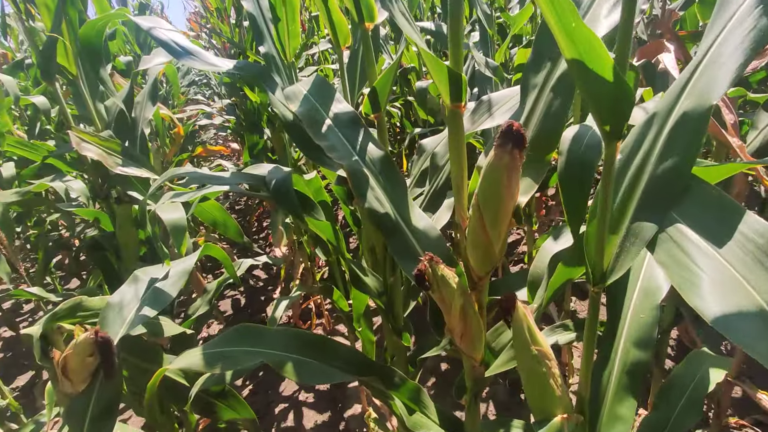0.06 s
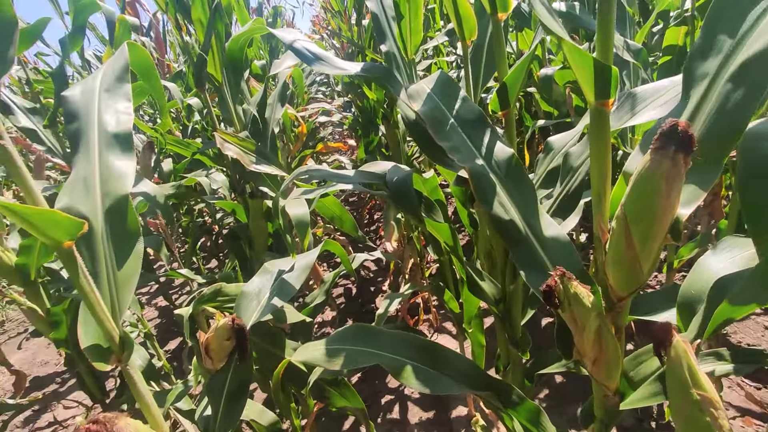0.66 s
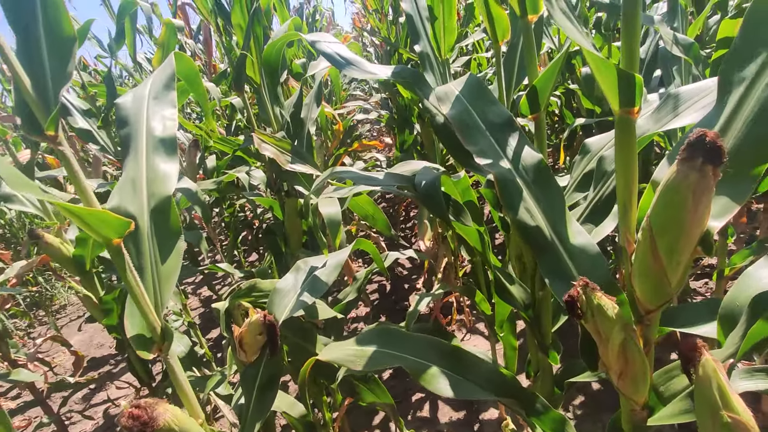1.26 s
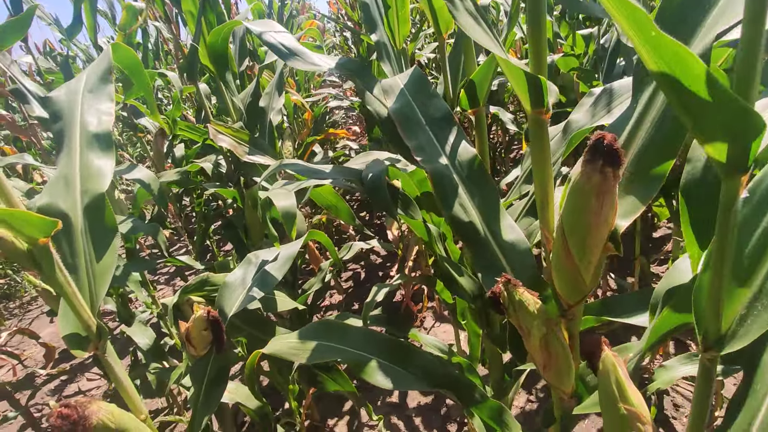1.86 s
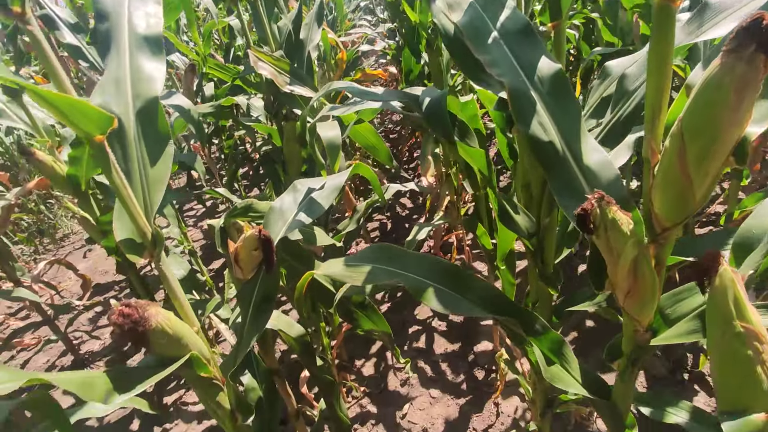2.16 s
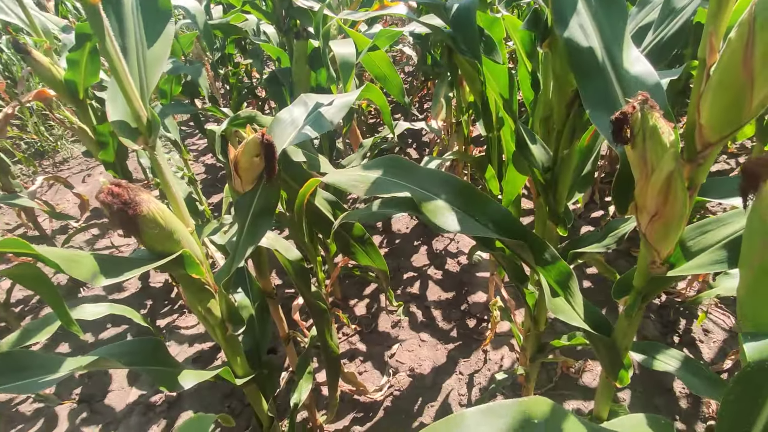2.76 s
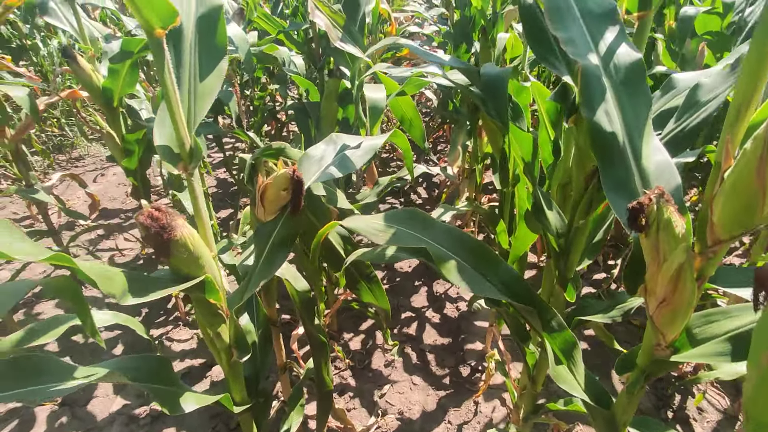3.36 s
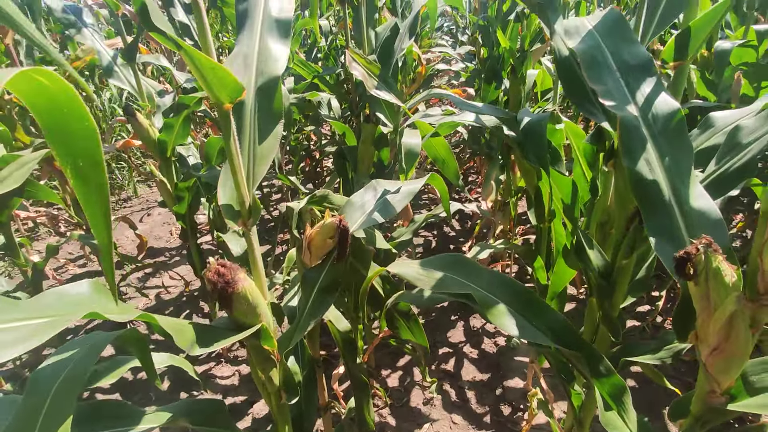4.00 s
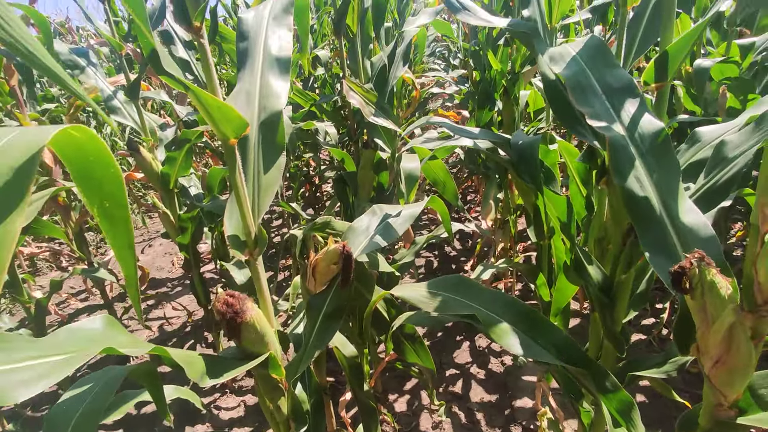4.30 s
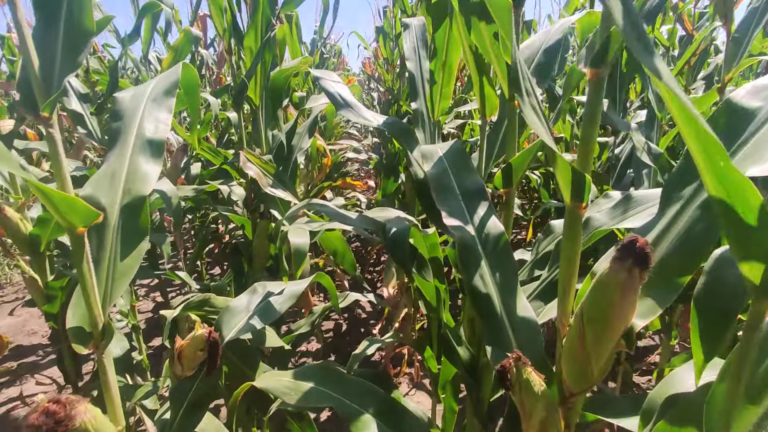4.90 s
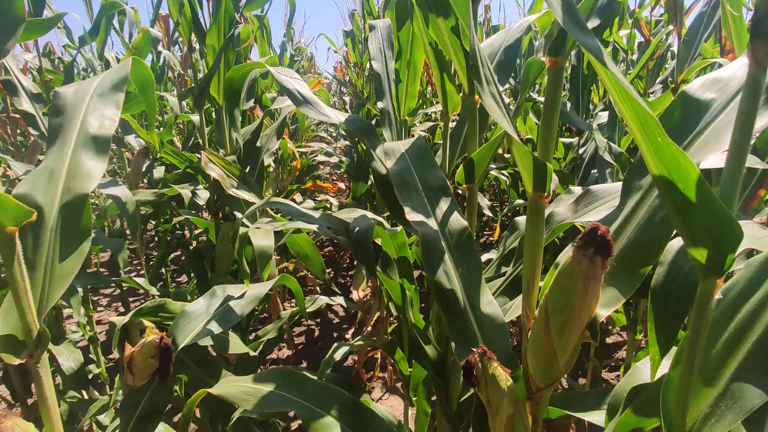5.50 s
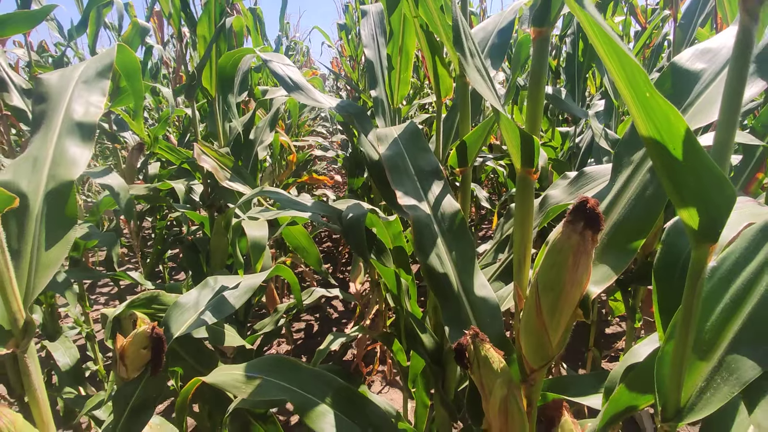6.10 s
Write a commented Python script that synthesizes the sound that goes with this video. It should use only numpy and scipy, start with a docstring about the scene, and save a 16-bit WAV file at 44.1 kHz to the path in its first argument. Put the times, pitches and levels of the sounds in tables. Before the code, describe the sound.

Dry leaves rustle and crackle close by as someone pushes slowly through tall maize, with a few light knocks and one sharp snap.

```python
"""A dry rustle swells and fades as someone pushes slowly through tall maize, a camera among the leaves.
The rustle is stick-slip friction: stiff blades slide over each other in countless tiny slips, and now
and then grip and creak. Buckling blades release their strain in sharp crackles, and one rib snaps.
A few leaves and stalks knock against the casing; faint air rumbles at its two microphone ports."""
import sys
import numpy as np
from scipy import signal
from scipy.fft import rfft, irfft, next_fast_len
from scipy.io import wavfile
from scipy.ndimage import uniform_filter1d, map_coordinates

SR = 44100
rng = np.random.default_rng(int(sys.argv[2]) if len(sys.argv) > 2 else 0)


def transcribe(signal):
    """Save signal, clipped to [-1, 1], as a 16-bit WAV file at the path in sys.argv[1]."""
    frames = np.atleast_2d(signal).T
    limited = np.clip(frames, -1, 1)
    pcm = np.round(limited * 32767).astype(np.int16)
    wavfile.write(sys.argv[1], SR, pcm)


N = 275625

# spectrum of moving air: frequency_hz, density_db
AIR_SPECTRUM = [(15, 3.5), (30, 3.5), (60, -2.5), (120, -7.5), (300, -17), (1000, -73)]
# puffs of air at the ports: peak_s, half_length_s, level_db
AIR_PUFFS = [(0.02, 0.1, -58.5), (0.853, .08, -63), (1.182, 0.1, -69), (1.536, 0.091, -64),
             (2.145, 0.06, -61), (2.342, 0.14, -65)]
# two leaves grip and creak: centre_s, level_db, pitch_hz, length_s
LEAF_CREAKS = [(0.824, -44.5, 865, 0.049), (0.923, -39.5, 1080, 0.035), (0.98, -46.5, 980, 0.26),
               (1.049, -40.5, 1150, 0.072), (1.089, -49.5, 750, 0.052), (1.511, -38, 3100, 0.033),
               (2.864, -37, 2210, 0.016), (2.93, -34, 2120, 0.031), (3.131, -44.5, 1130, 0.074),
               (4.235, -48, 865, 0.13), (4.282, -33, 2170, 0.068), (4.993, -38.5, 2050, 0.045),
               (5.087, -53, 480, 0.059), (5.227, -49, 500, 0.089), (5.601, -54.5, 350, 0.074),
               (5.666, -57, 370, 0.11), (5.994, -37.5, 2300, .04), (6.150, -44.5, 2050, 0.06)]
# blows on the casing: start_s, level_db, pitch_hz, ring_q, thud_re_ring_db, left_minus_right_db
CASING_KNOCKS = [(0.641, -27.5, 1700, 1.7, -42, -1), (0.6418, -40, 556, 4.2, -42, -3),
                 (1.9361, -21.5, 1400, 0.47, -15, 11), (1.9414, -23, 1180, 1.6, -13, 33),
                 (2.23, -32, 900, 1, -19, 3), (2.4637, -22, 560, 0.53, -27, -43),
                 (3.1187, -28, 1110, 6.5, -57, 3), (3.166, -21, 1420, 1.8, -52, 0),
                 (3.2153, -30.5, 450, 2, -37, 2), (3.216, -27.5, 1290, 14, -39, 12),
                 (4.773, -34, 1080, 2.4, -38, 17), (5.422, -35, 860, 2.4, -27, 4),
                 (5.582, -38.5, 503, 2, -16, 2), (5.974, -30.5, 750, 2.9, -45, -3)]
# blades buckle: start_s, level_db, pitch_hz, edge_db (sets the top treble), decay_s
BLADE_BUCKLES = [(0.1326, -26, 3680, -47, 0.0024), (0.183, -32.5, 2580, -66, 0.0035),
                 (0.287, -39, 2380, -41, 0.0022), (0.378, -29, 3100, -60, 0.0022),
                 (0.4416, -29, 5010, -37, 0.0014), (0.471, -32, 2800, -64, .002),
                 (0.5676, -23, 4900, -36, 0.0017), (0.585, -32, 2700, -66, .003),
                 (0.677, -31, 2950, -51, 0.0045), (0.692, -28.5, 4240, -34.5, 0.0049),
                 (0.773, -21, 4270, -52, 0.00091), (0.7926, -17, 4220, -36, 0.0018),
                 (0.8365, -18, 4840, -34, 0.0025), (0.8451, -17, 4690, -23, 0.0014),
                 (0.8555, -24, 3920, -27, .0015), (0.8582, -13.5, 4300, -44, 0.0017),
                 (0.941, -24, 3300, -50, 0.00071), (0.999, -20, 3540, -62, 0.0037),
                 (1.0112, -26, 4000, -40, .002), (1.0533, -21, 3180, -54, 0.0015),
                 (1.0624, -12, 4160, -55, 0.0013), (1.142, -30, 3200, -67, 0.003),
                 (1.2102, -23, 4100, -52, 0.0018), (1.5069, -27, 3200, -63, 0.0017),
                 (1.5797, -27.5, 3300, -49, 0.0072), (1.762, -32, 2900, -63, 0.0011),
                 (1.995, -34, 2500, -64, 0.0018), (2.0542, -32.5, 3100, -55, .002),
                 (2.1538, -33.5, 4100, -56, 0.0017), (2.2286, -24, 4000, -46, 0.0085),
                 (2.3270, -22.5, 4200, -60, 0.0018), (2.7015, -25.5, 3500, -56, 0.0016),
                 (2.7336, -21, 4550, -54, 0.0016), (2.7742, -29.5, 2900, -62, 0.0031),
                 (2.789, -27, 2300, -68, .001), (2.809, -27, 1860, -70, 0.0013),
                 (2.8236, -33, 3200, -68, .0008), (2.835, -33, 4100, -68, .0007),
                 (2.8616, -24.5, 2180, -69, .0015), (2.9192, -17.5, 2400, -55, 0.00075),
                 (2.929, -30, 2580, -53, 0.0026), (3.118, -24, 4200, -56, 0.0011),
                 (3.171, -26, 5920, -52, .0015), (3.1966, -26, 5900, -58, 0.0007),
                 (3.203, -33, 6000, -66, 0.0012), (3.2880, -28.5, 3370, -68, 0.0018),
                 (3.3565, -22, 3600, -62, .0018), (3.363, -29, 4000, -66, 0.002),
                 (3.412, -24, 2470, -74, 0.0025), (3.831, -26.5, 3800, -65, .001),
                 (3.934, -29, 3180, -66, 0.0046), (4.026, -22.5, 3600, -71, .0015),
                 (4.094, -28, 4000, -36, 0.0023), (4.243, -18, 3700, -55, 0.0017),
                 (4.267, -16.5, 3800, -48, 0.0013), (4.277, -16, 4200, -52, 0.0013),
                 (4.2895, -22, 2300, -32, 0.0053), (4.321, -29, 3600, -70, 0.0034),
                 (4.377, -33.5, 3880, -72, .0008), (4.43, -27.5, 5300, -62, 0.0027),
                 (4.569, -27.5, 3770, -58, 0.002), (4.626, -24, 3280, -58, 0.0018),
                 (5.08, -30, 4600, -60, .0015), (5.187, -27.5, 4500, -60, 0.0025),
                 (5.216, -22, 2860, -57, 0.0023), (5.428, -28.5, 2600, -69, 0.0051),
                 (5.5380, -28.5, 5530, -54, 0.0037), (5.6404, -25, 5000, -65, 0.0034),
                 (5.9731, -21.5, 4260, -37, 0.0026), (6.134, -27, 2200, -77, 0.002),
                 (6.141, -26, 4130, -73, 0.0012), (6.148, -23.5, 3870, -62, 0.0013),
                 (6.2005, -18.5, 2280, -54, 0.0044), (6.208, -20.5, 4400, -64, 0.003),
                 (6.2200, -20, 2450, -47, 0.0021)]
# the two steps of a breaking rib: start_s, level_db, pitch_hz
RIB_BREAKS = [(3.2128, -9, 5500), (3.2148, -6, 4300)]
# spectrum of one slip on a blade: frequency_hz, density_db
SLIP_SPECTRUM = [(60, -36), (150, -25.5), (250, -15.5), (420, -11.5), (750, -9), (1150, -3.5), (1600, -1.5),
                 (2300, 0), (3500, 1.5), (5000, -0.5), (6600, -2), (7400, -17.5), (10000, -21.5),
                 (14000, -32)]
# leaves stirring all around: time_s, level_db
STIR_LEVELS = [(0.0, -46), (0.66, -50), (0.96, -39), (1.29, -49), (1.69, -42.5), (2.07, -47.5),
               (3.13, -47.5), (4.54, -48), (4.92, -49.5), (5.1, -46), (5.73, -49), (6.25, -45)]
# leaves swing clear and the stirring drops (or rises, at negative depth): centre_s, depth_db
STIR_LULLS = [(.16, 6.5), (.405, 3), (.64, -2), (1.12, 6.5), (1.36, -1), (1.97, 4.5), (2.2, 6), (2.55, 0.5),
              (2.82, 0.5), (3.45, 0), (4.39, 5.5), (6.11, 4)]
# a leaf drags past, gripping harder until it slides free:
# peak_s, rise_s, release_s, level_db, rasp_hz, rasp_height_db, body_re_level_db, edge_re_level_db
LEAF_STROKES = [(.10, 0.065, 0.046, -44.5, 1950, 13, -12.5, -22),
                (.32, 0.16, .12, -46.5, 2420, 1, -13, -14.5), (.52, 0.4, 0.15, -49, 2380, 7.5, -14.5, -15),
                (.72, 0.038, 0.044, -37.5, 3700, 4, -35, -17),
                (0.859, 0.049, 0.027, -29.5, 3960, 3, -37, -18),
                (.985, 0.098, 0.063, -27.5, 3680, 12, -24, -21),
                (1.053, 0.037, 0.02, -26, 4070, 8, -24.5, -19),
                (1.085, 0.014, 0.015, -39, 2700, 8, -22, -17),
                (1.175, 0.016, 0.031, -34, 3220, 11.5, -18.5, -21),
                (1.24, 0.046, 0.081, -41.5, 3300, -1, -17, -20),
                (1.308, 0.043, 0.019, -35, 3300, 8.5, -20, -19),
                (1.432, 0.019, 0.01, -40.5, 3160, 7, -20, -26),
                (1.475, 0.022, 0.031, -43, 3140, 7, -21, -21),
                (1.517, 0.024, 0.027, -39.5, 3120, 8.5, -29, -19),
                (1.6, 0.026, 0.11, -39.5, 3000, -1.5, -34, -22),
                (1.81, 0.14, 0.056, -44.5, 2440, 10, -15, -19),
                (2.261, 0.012, 0.035, -34, 3560, 2, -19.5, -21),
                (2.32, 0.013, 0.017, -40.5, 3600, 6.5, -20, -17),
                (2.383, 0.038, 0.018, -33, 4550, 1.5, -24, -18.5),
                (2.471, 0.033, 0.034, -37, 4140, -1.5, -18.5, -23),
                (2.63, 0.028, 0.068, -41.5, 3550, 1, -21, -25),
                (2.73, 0.057, 0.035, -41, 3660, 4, -13, -22), (2.89, 0.033, 0.05, -40, 3780, 7.5, -18, -22),
                (2.929, 0.011, 0.012, -36.5, 2600, 6, -12.5, -27),
                (3.04, 0.11, 0.063, -39.5, 3770, 7, -41, -20.5),
                (3.118, 0.011, 0.038, -34, 6100, 7.5, -25, -18.5),
                (3.199, 0.011, 0.018, -38.5, 5870, 6, -18, -19),
                (3.36, 0.056, 0.047, -37, 3300, 5, -41, -24),
                (3.5, 0.034, 0.058, -35.5, 4130, 4.5, -29, -20),
                (3.61, 0.1, 0.075, -37, 4100, 1.5, -19, -19), (3.8, 0.19, 0.082, -44, 3330, 3, -33, -21),
                (3.945, 0.056, 0.037, -37, 3450, 7.5, -22, -17.5),
                (4.024, 0.092, 0.082, -36, 3530, 6, -17, -21.5),
                (4.23, 0.079, 0.056, -39, 3700, 6, -11.5, -19.5),
                (4.276, 0.048, 0.021, -27.5, 3920, 4, -25, -22),
                (4.44, 0.0069, 0.0085, -39.5, 5000, 5, -16, -18),
                (4.514, 0.025, 0.011, -36.5, 3400, 3, -19, -17.5),
                (4.67, 0.14, 0.089, -40.5, 3630, 3, -20.5, -22.5),
                (4.896, 0.047, 0.047, -37, 4900, 9.5, -17.5, -20.5),
                (4.982, 0.058, 0.041, -35.5, 4480, 6.5, -21.5, -19.5),
                (5.083, 0.033, 0.021, -35, 4830, 7.5, -18.5, -18),
                (5.19, 0.11, 0.064, -34.5, 4400, 0.5, -21, -23),
                (5.29, 0.039, 0.032, -36.5, 4500, 1.5, -17, -23),
                (5.38, 0.08, 0.11, -39.5, 3500, 0, -20, -21),
                (5.63, 0.07, 0.072, -36.5, 4800, 4.5, -15.5, -20.5),
                (5.85, 0.11, 0.11, -45, 3500, -2, -16.5, -25),
                (5.985, 0.018, 0.064, -31, 5300, 4.5, -19, -19.5),
                (6.145, 0.0062, 0.0085, -40, 2100, -13, -23, -28),
                (6.208, 0.0078, 0.016, -38.5, 2090, 7, -14.5, -30)]
# the left port hears more of the presence range: frequency_hz, left_minus_right_db
PORT_BALANCE = [(150, .5), (770, 1.5), (1170, 3.3), (1800, 7), (2700, 10.5), (4200, 12), (6000, 11),
                (6700, 14), (7400, 0)]


def amp(db):
    """Amplitude ratio of a level in decibels."""
    return 10 ** (np.asarray(db) / 20)


def unit(x):
    """Normalisation to an rms of 1."""
    return x / np.sqrt(np.mean(x ** 2) + 1e-20)


def along(points, hz):
    """Interpolation of (frequency_hz, value) points on a logarithmic frequency axis."""
    frequencies, values = np.transpose(points)
    return np.interp(np.log(hz + 1), np.log(frequencies + 1), values)


def wobble(rate_hz):
    """Smooth random modulation: a spline through rate_hz knots a second."""
    knots = rng.standard_normal(int(N * rate_hz / SR) + 4)
    return map_coordinates(knots, [np.arange(N) * rate_hz / SR])


def swell(peak_s, rise_s, release_s, drop_db=9):
    """Envelope peaking at 1, drop_db lower one rise time before and one release time after."""
    t = np.arange(N) / SR - peak_s
    away = np.where(t < 0, -t / max(rise_s, .004), t / max(release_s, .004))
    near = away < 6
    curvature = np.where(t[near] < 0, 1.54, 1.79)
    gain = np.zeros(N)
    gain[near] = amp(-drop_db * away[near] ** curvature)
    return gain


def filtered(x, response):
    """Linear filtering: the spectrum is multiplied by a complex frequency response."""
    n = x.shape[-1]
    padded = next_fast_len(n + 4096)
    return irfft(rfft(x, padded) * response(np.fft.rfftfreq(padded, 1 / SR)), padded)[..., :n]


def coloured(x, gain_db, size=2048):
    """Minimum-phase filtering: folding the cepstrum makes a gain curve causal."""
    cepstrum = irfft(np.log(amp(gain_db(np.fft.rfftfreq(size, 1 / SR)))))
    cepstrum[..., 1:size // 2] *= 2
    cepstrum[..., size // 2 + 1:] = 0
    impulse_response = np.atleast_2d(irfft(np.exp(rfft(cepstrum))))
    return signal.fftconvolve(x, impulse_response, axes=1)[:, :x.shape[-1]]


def resonance(hz, centre_hz, q):
    """Response of a damped harmonic oscillator, 1 at its centre."""
    return 1j * hz * centre_hz / q / (centre_hz ** 2 - hz ** 2 + 1j * hz * centre_hz / q)


def add(track, start_s, sound):
    """Superposition of a stereo sound on the track."""
    part = track[:, round(start_s * SR):][:, :sound.shape[1]]
    part += sound[:, :part.shape[1]]


def air(calm_db=-78):
    """Pressure fluctuations of light draughts rumble independently at each port."""
    puff_power = sum((amp(db) * swell(peak_s, half_s, half_s)) ** 2 for peak_s, half_s, db in AIR_PUFFS)
    rumble = filtered(rng.standard_normal((2, N)), lambda hz: amp(along(AIR_SPECTRUM, hz)))
    return np.sqrt(amp(calm_db) ** 2 + puff_power) * unit(rumble * amp(1.2 * wobble(19)))


def creaks():
    """Forced resonance: friction between gripping leaves briefly drives a narrow mode."""
    track = np.zeros((2, N))
    for centre_s, level_db, pitch_hz, length_s in LEAF_CREAKS:
        size = int(length_s * SR)
        grip = rng.standard_normal(size) + 1.1 * rng.standard_normal((2, size))
        ring = unit(filtered(grip, lambda hz: resonance(hz, pitch_hz, q=3) ** 2))
        add(track, centre_s - length_s / 2, amp(level_db) * ring * np.hanning(size) ** 4)
    return track


def fracture(pitch_hz, decay_s, ring, edge, size=4096):
    """Acoustic emission: a dying run of fibre breaks rings a patch of leaf; edge tilts the top treble."""
    fade = np.exp(-np.arange(size) / SR / decay_s)
    direct, scattered = rng.standard_normal((2, size)) * amp(rng.standard_normal(size)) * fade
    direct[0] = 2.2  # the first break is the sharpest
    lag_s = rng.normal(.00014, .0001)
    right = .83 * filtered(direct, lambda hz: np.exp(-2j * np.pi * hz * lag_s)) + 1.02 * scattered
    rung = filtered(np.array([direct, right]), lambda hz: 1 + ring * resonance(hz, pitch_hz, q=3.5))
    # a small patch radiates little bass
    patch_db = lambda hz: along([(150, -13), (700, -6), (2000, -2.5)], hz)
    tilt_db = lambda hz: edge * along([(6500, .011), (8000, .66)], hz)
    sound = coloured(rung, lambda hz: along(SLIP_SPECTRUM, hz) + patch_db(hz) + tilt_db(hz))
    return unit(sound) * np.sqrt(np.mean(fade ** 2))


def knocks(size=2048):
    """Impact excitation: the struck casing gives a tick, a ring and a thud, louder at the nearer port."""
    track, blow = np.zeros((2, N)), signal.unit_impulse(size)
    low_modes = lambda hz: resonance(hz, 410, q=2.4) - .22 * resonance(hz, 85, q=.6)
    thud = filtered(blow, lambda hz: low_modes(hz) / (1 + 1j * hz / 700))
    for start_s, level_db, pitch_hz, q, thud_db, pan_db in CASING_KNOCKS:
        ring = filtered(blow, lambda hz: resonance(hz, pitch_hz, q) / (1 + 1j * hz / 3000))
        tick = amp(-9.5) * fracture(pitch_hz, decay_s=.0022, ring=.7, edge=3, size=size)
        knock = ring / np.abs(ring).max() + amp(thud_db) * thud / np.abs(thud).max()
        sides = amp([[pan_db / 2], [-pan_db / 2]])
        add(track, start_s, amp(level_db) * (knock + tick) * sides / sides.mean())
    return track


def ticks(count=170, level_db=-36, scatter_db=1.5, pitch_hz=3270, scatter_octaves=.55):
    """Small random buckles grow by a power law, more slowly than the rubbing, so stand out in lulls."""
    track, face_gain = np.zeros((2, N)), rubbing()[0]
    for onset, strength, detune in zip(rng.integers(0, N, count), *rng.standard_normal((2, count))):
        tick_hz = pitch_hz * 2 ** (scatter_octaves * detune)
        tick = fracture(tick_hz, decay_s=.001, ring=2.5, edge=-7, size=1024)
        push = (face_gain[onset] / amp(-40)) ** .65
        add(track, onset / SR, push * amp(level_db + scatter_db * strength) * tick)
    return track


def crackles(trim_db=-2.5, delay_s=.000789):
    """Buckling releases a blade's strain in milliseconds; larger, lower patches ring more clearly."""
    track = np.zeros((2, N))
    for start_s, level_db, pitch_hz, edge_db, decay_s in BLADE_BUCKLES:
        ring = 1.35 * (3500 / pitch_hz) ** .7
        crack = fracture(pitch_hz, decay_s, ring, edge=edge_db - level_db + 25)
        add(track, start_s + delay_s, amp(level_db + trim_db) * crack)
    return track


def rib_snap(trim_db=-3):
    """Brittle fracture: a rib cracks in two steps, then its fibres tear on for a moment."""
    track = np.zeros((2, N))
    for start_s, level_db, pitch_hz in RIB_BREAKS:
        add(track, start_s, amp(level_db + trim_db) * fracture(pitch_hz, decay_s=.0012, ring=3.2, edge=5))
    tear = amp(-18) * fracture(pitch_hz=6300, decay_s=.019, ring=.67, edge=-1)
    add(track, RIB_BREAKS[-1][0], tear)
    return track


def rubbing(stir_trim_db=-.5, lull_half_s=.031):
    """Incoherent sources add in power: strokes and stirring set three band gains and the mean rasp."""
    def traits(rasp_hz, height_db, body_db, edge_db):
        """Quantities to be weighted by each source's power."""
        return np.array([1, amp(body_db) ** 2, amp(edge_db) ** 2, np.log(rasp_hz), height_db])[:, None]
    stir_db = np.interp(np.arange(N) / SR, *np.transpose(STIR_LEVELS)) + stir_trim_db
    stir_db -= sum(depth_db * swell(at_s, lull_half_s, lull_half_s) for at_s, depth_db in STIR_LULLS)
    total = traits(rasp_hz=2220, height_db=.5, body_db=-15, edge_db=-20.5) * amp(stir_db) ** 2
    for peak_s, rise_s, release_s, level_db, *colour in LEAF_STROKES:
        power = (amp(level_db) * swell(peak_s, rise_s, release_s)) ** 2
        active = power > 0
        total[:, active] += traits(*colour) * power[active]
    face, body, edge, log_pitch_sum, height_sum = total
    return np.sqrt(face), np.sqrt(body), np.sqrt(edge), np.exp(log_pitch_sum / face), height_sum / face


def slips(rate_hz, spread_db, scatter_s, lag_s=.00019):
    """Shot noise of uneven slips; each reaches the right port with the lag of its own direction."""
    count = int(rate_hz * N / SR)
    onsets = rng.uniform(0, N, count)
    impulses = amp(spread_db * np.minimum(rng.standard_normal(count), 2.7)) * rng.choice([-1, 1], count)
    lags = (lag_s + scatter_s * rng.standard_normal(count)) * SR
    return unit(np.array([np.bincount(at.astype(int) % N, impulses, N) for at in (onsets, onsets + lags)]))


def flexing(x, rasp_hz, height_db, patchy_db=1.6, width_octaves=.33):
    """Bending shifts a blade's resonances: a broad rasp glides while narrow peaks come and go."""
    hz, t, spectra = signal.stft(x, SR, nperseg=512)
    def patches(bins):
        """Random field, smoothed over frequency and time."""
        field = uniform_filter1d(rng.standard_normal(spectra.shape[1:]), size=bins, axis=0)
        return unit(uniform_filter1d(field, size=4, axis=1))
    framed = lambda curve: np.interp(t, np.arange(N) / SR, curve)
    octaves = np.log2((hz[:, None] + 1) / framed(rasp_hz))
    bump = lambda offset: np.exp(-.5 * (offset / width_octaves) ** 2)
    rasp_db = framed(height_db) * (bump(octaves) + .15 * bump(octaves + 2))  # plus a low whole-blade mode
    gain = amp(rasp_db + patchy_db * (patches(bins=2) + patches(bins=7)))
    power = amp(along(SLIP_SPECTRUM, hz))[:, None] ** 2
    gain /= np.sqrt((power * gain ** 2).sum(axis=0) / power.sum())  # the colour shifts, the energy stays
    return unit(signal.istft(spectra * gain, SR, nperseg=512)[1][:, :N])


def rustle(body_hz=1000, edge_hz=7400):
    """Stick-slip friction sounds through the blades in three bands: hollow body, rasping face, dry edge."""
    face_gain, body_gain, edge_gain, rasp_hz, height_db = rubbing()
    slide = slips(rate_hz=24000, spread_db=3, scatter_s=.00012)
    crinkle = amp(-7.5) * slips(rate_hz=520, spread_db=.5, scatter_s=.00015)
    catching = amp(.8 * wobble(70) + .7 * wobble(260))  # edges catch and let go
    friction = flexing((slide + crinkle) * catching, rasp_hz, height_db)
    leaf = coloured(friction, lambda hz: along(SLIP_SPECTRUM, hz))
    low = lambda hz: 1 / (1 + (hz / body_hz) ** 4)
    high = lambda hz: 1 - 1 / (1 + (hz / edge_hz) ** 40)
    body = unit(filtered(leaf, low)) * body_gain
    face = unit(filtered(leaf, lambda hz: 1 - low(hz) - high(hz))) * face_gain
    edge = unit(filtered(leaf, high)) * edge_gain
    return body + face + edge


def scene():
    """Free field: the close sources superpose without reverberation."""
    return rustle() + crackles() + ticks() + creaks() + rib_snap() + knocks() + air()


def record(dry, top_hz=14700):
    """Frequency response of the camera: two ports of different colour, then a steep band limit."""
    def port_db(hz):
        """Gain of each port, with their mean power held at 1."""
        balance_db = along(PORT_BALANCE, hz)
        sides_db = np.array([balance_db, -balance_db]) / 2
        return sides_db - 10 * np.log10(np.mean(amp(sides_db) ** 2, axis=0))
    return filtered(coloured(dry, port_db), lambda hz: 1 / (1 + (hz / top_hz) ** 80))


dry = scene()
out = record(dry)
transcribe(out)
```